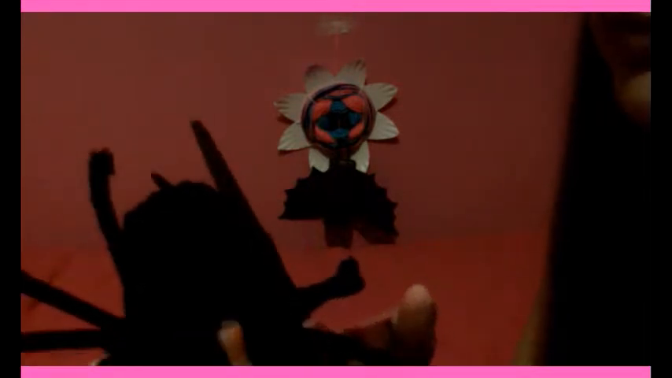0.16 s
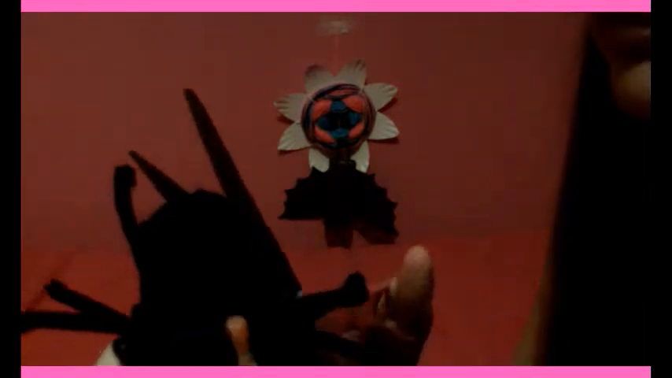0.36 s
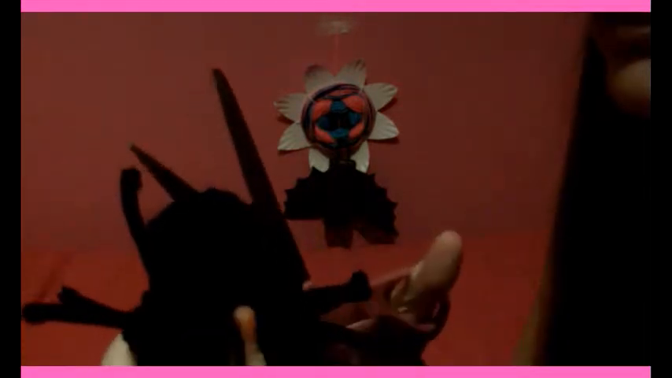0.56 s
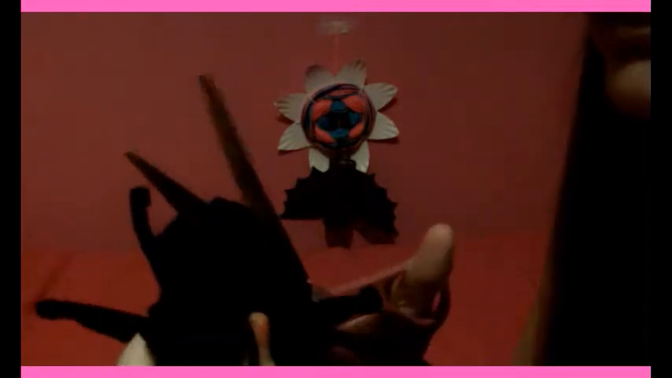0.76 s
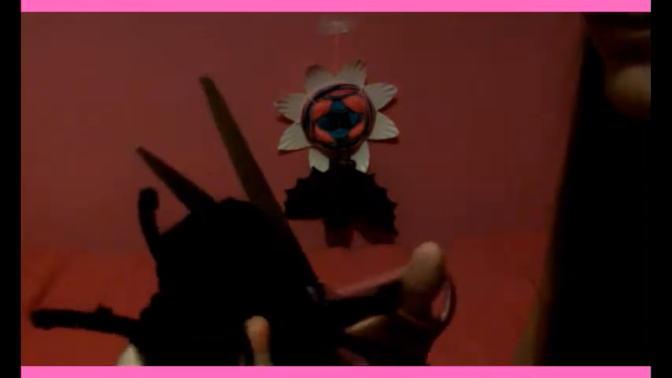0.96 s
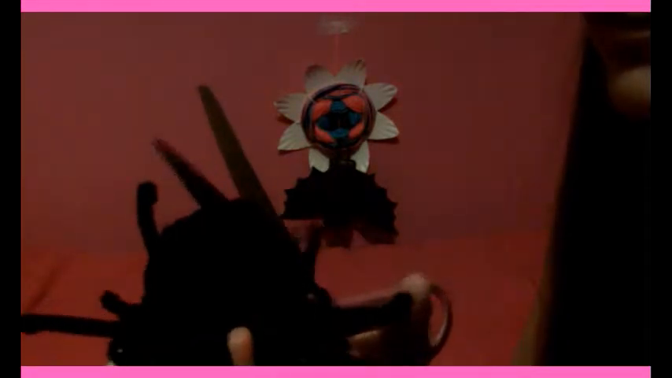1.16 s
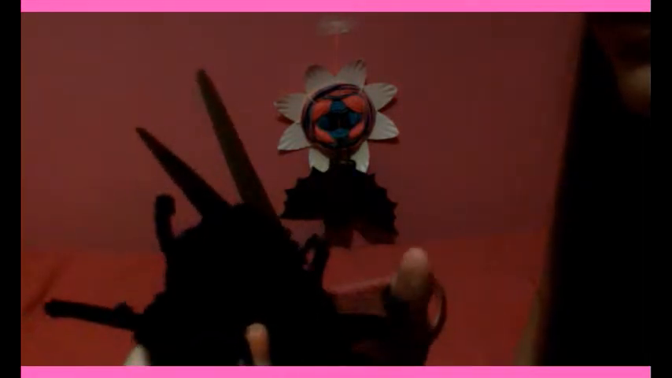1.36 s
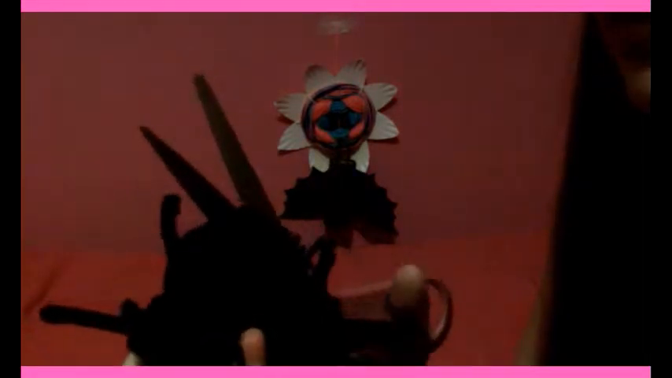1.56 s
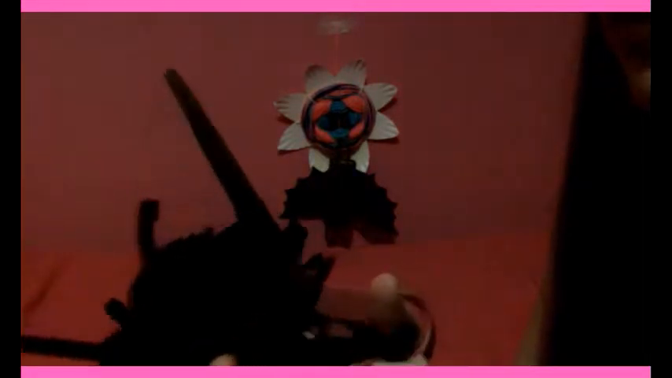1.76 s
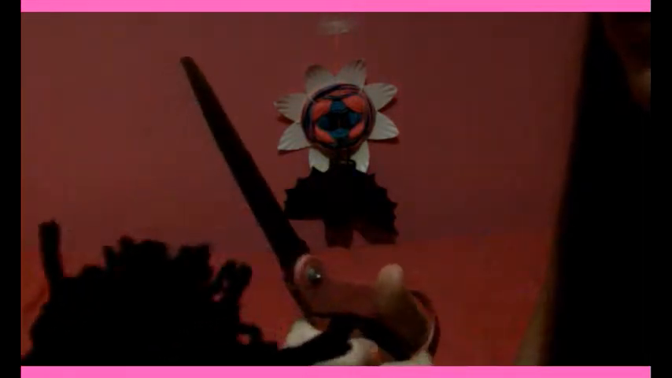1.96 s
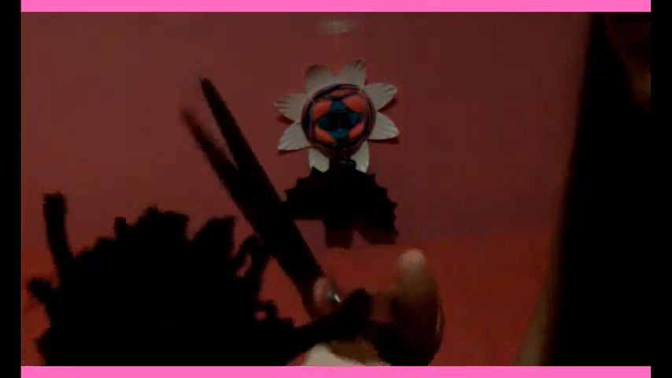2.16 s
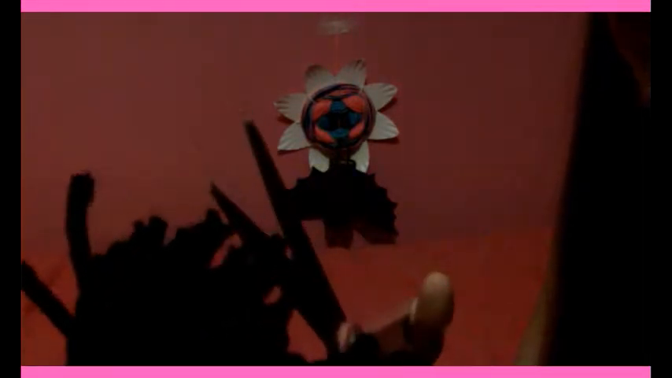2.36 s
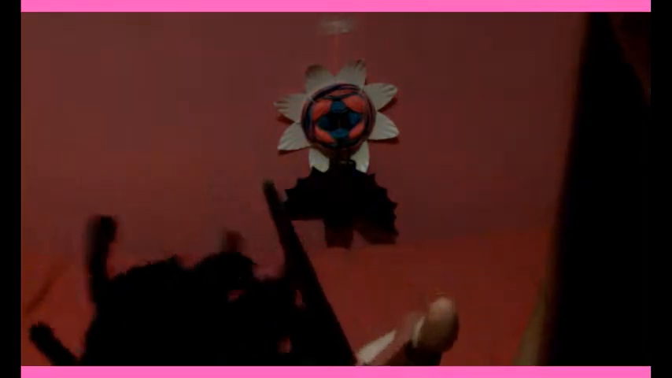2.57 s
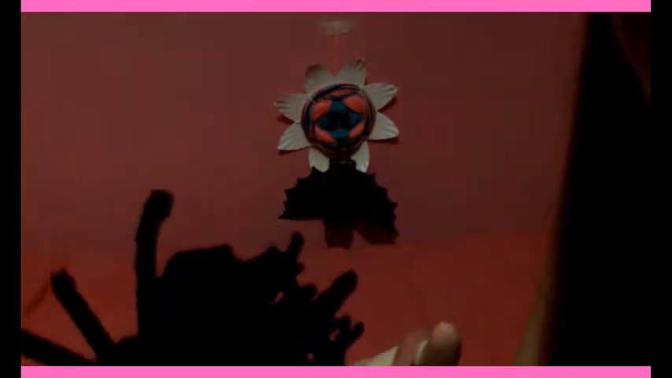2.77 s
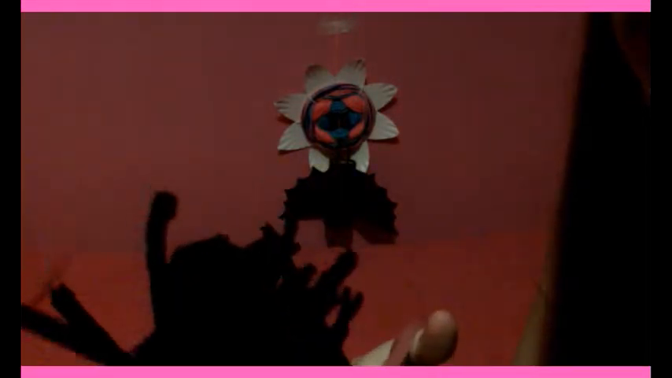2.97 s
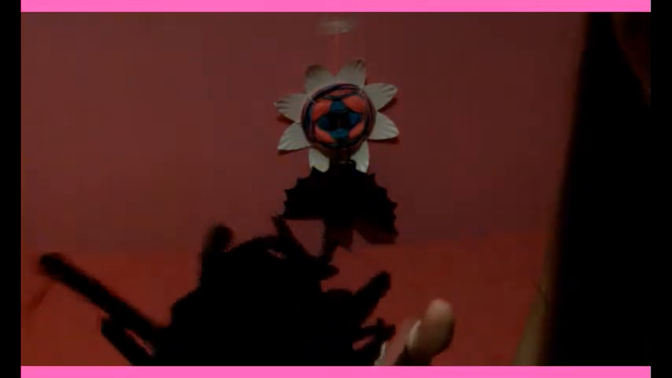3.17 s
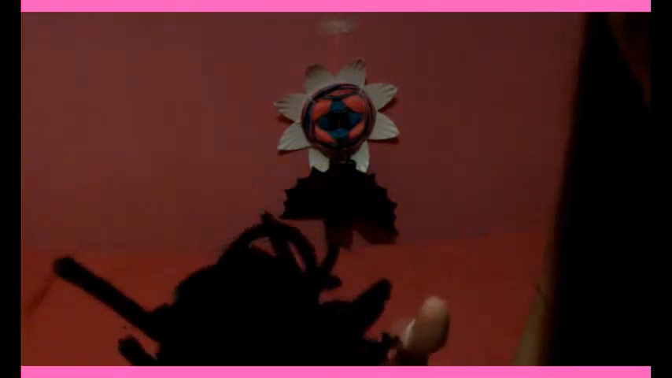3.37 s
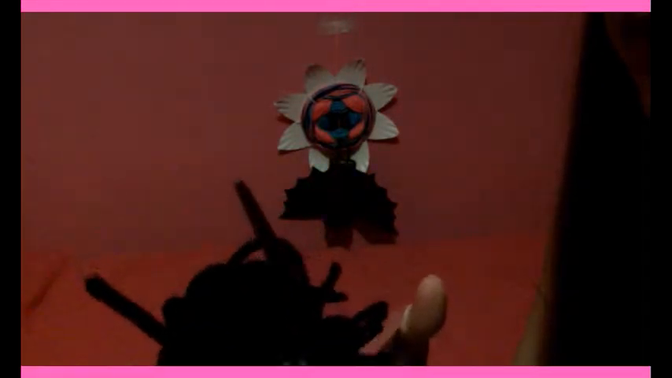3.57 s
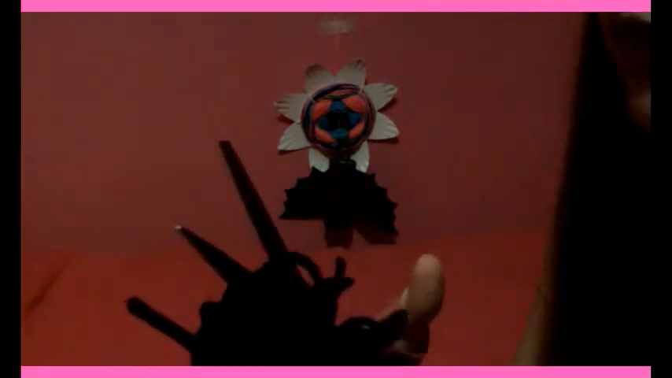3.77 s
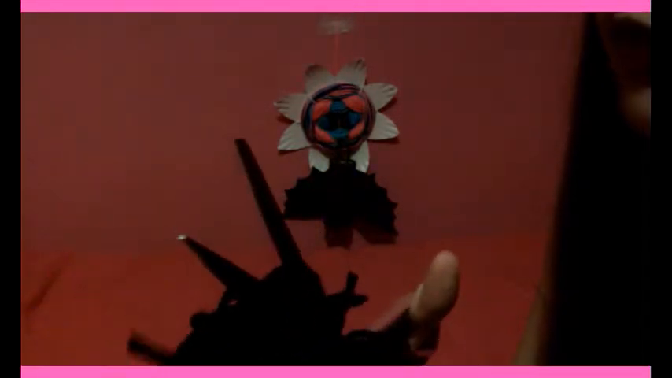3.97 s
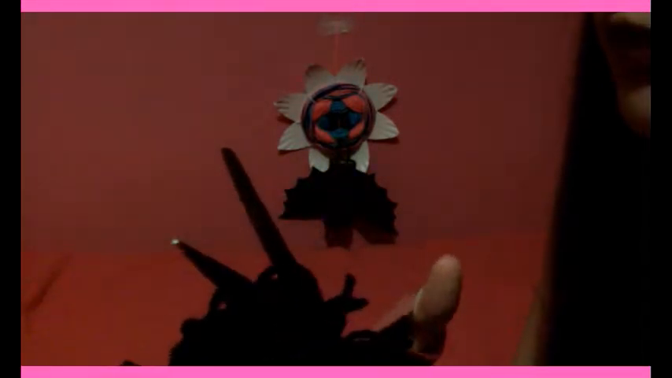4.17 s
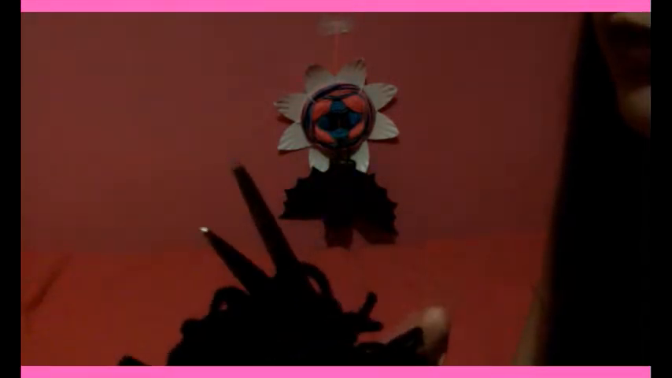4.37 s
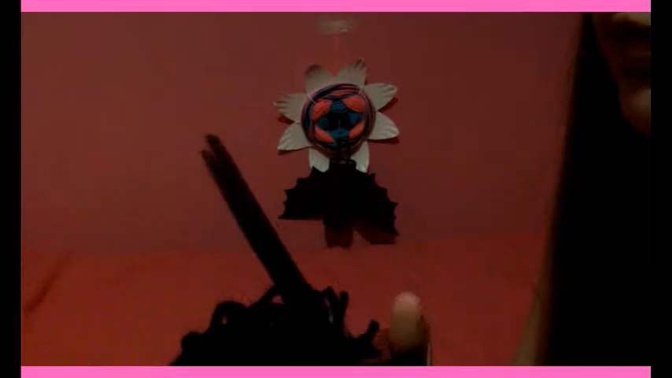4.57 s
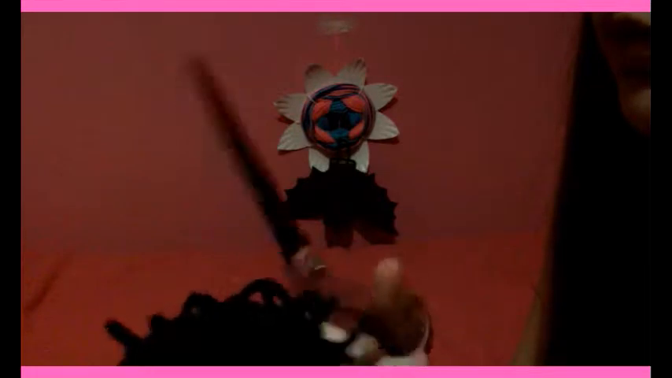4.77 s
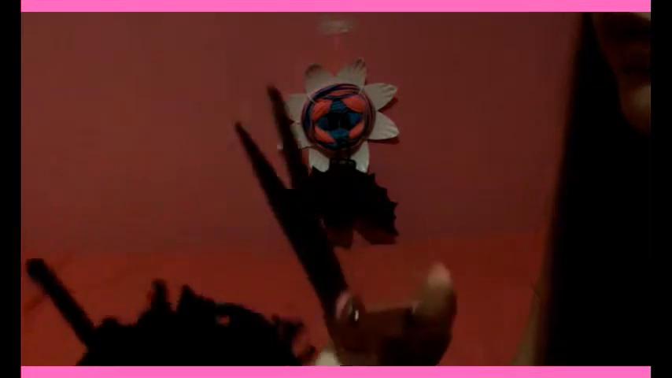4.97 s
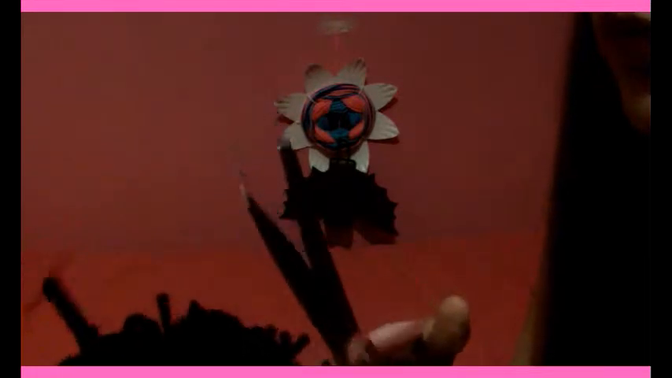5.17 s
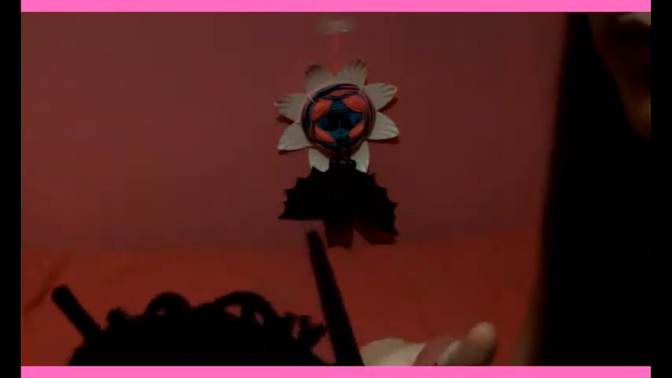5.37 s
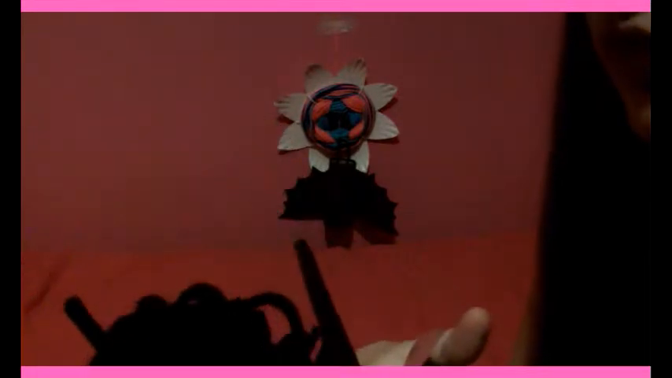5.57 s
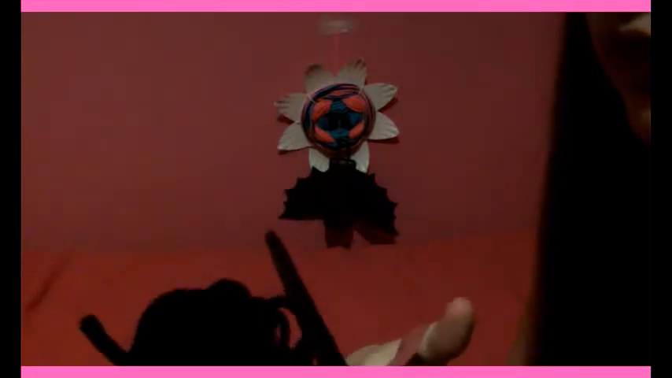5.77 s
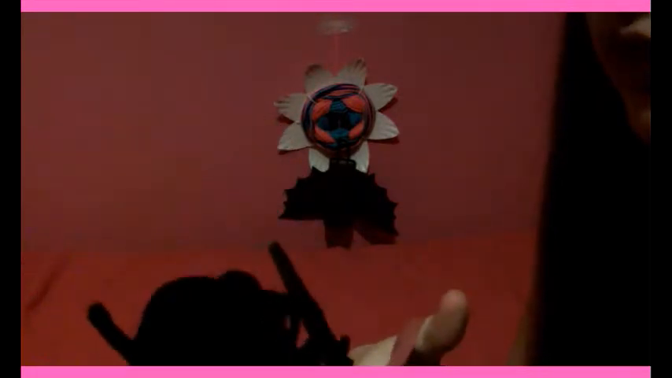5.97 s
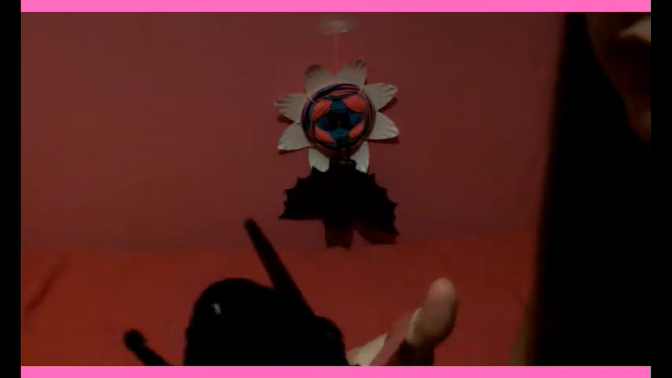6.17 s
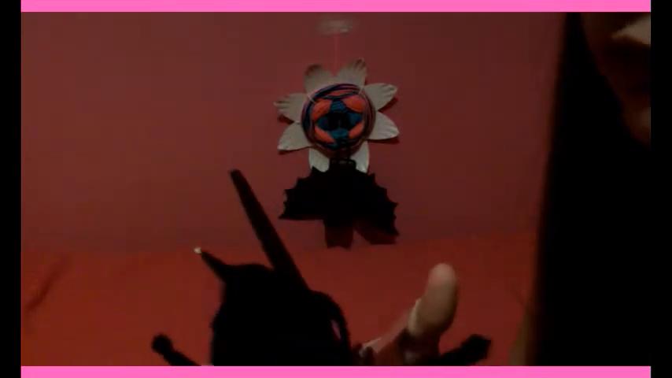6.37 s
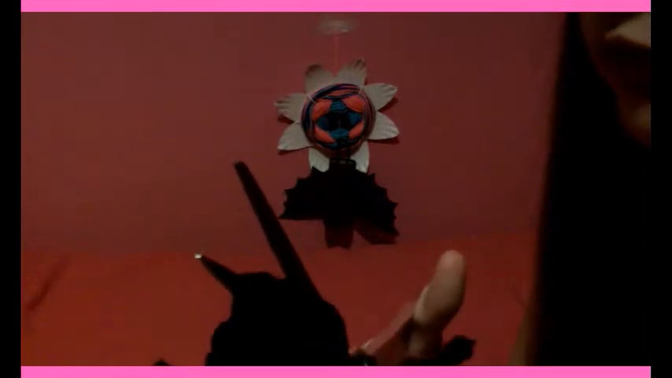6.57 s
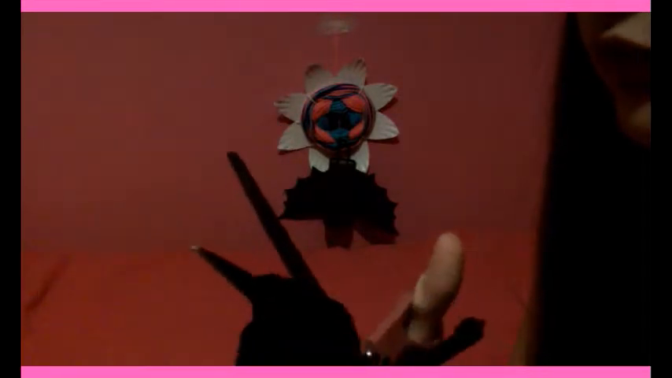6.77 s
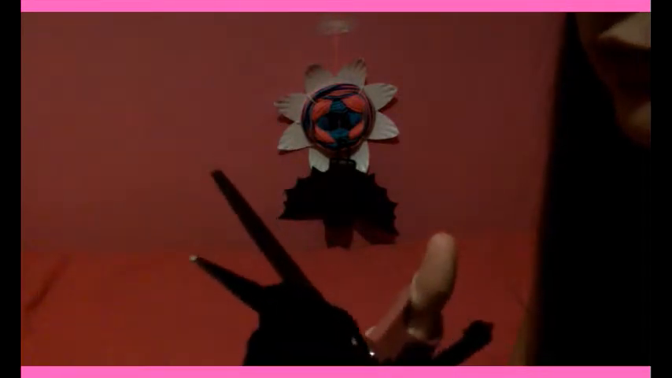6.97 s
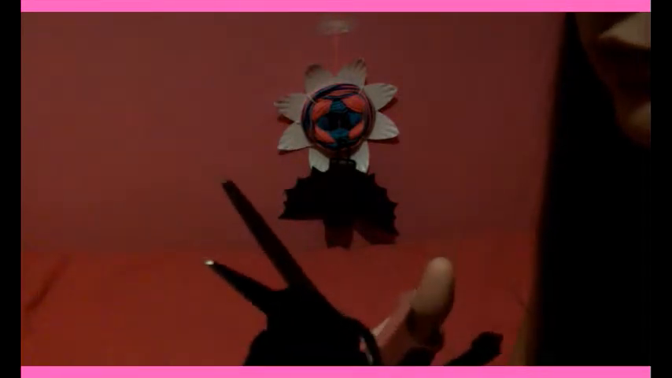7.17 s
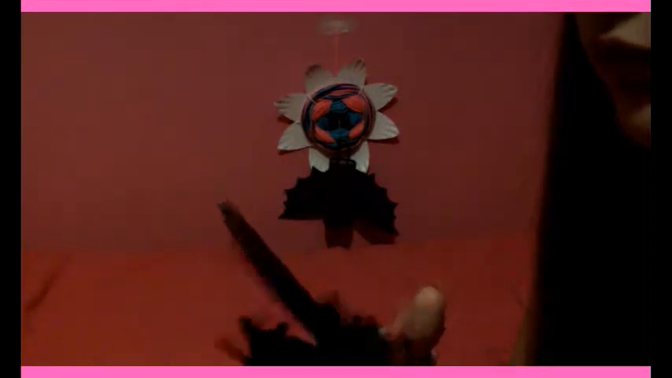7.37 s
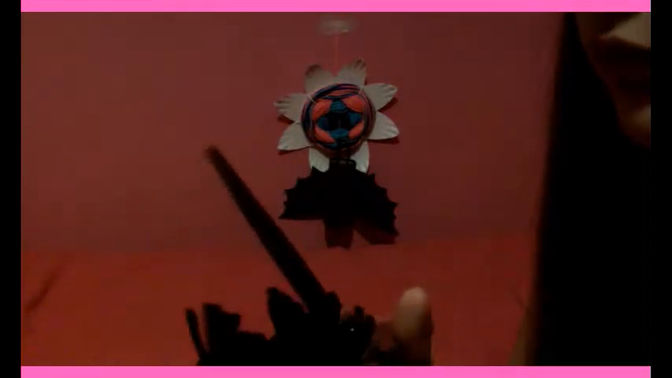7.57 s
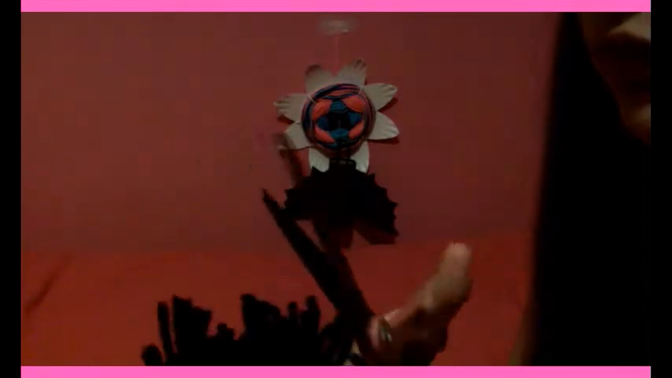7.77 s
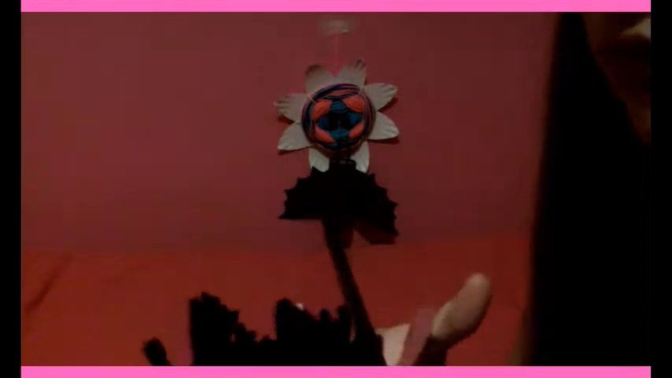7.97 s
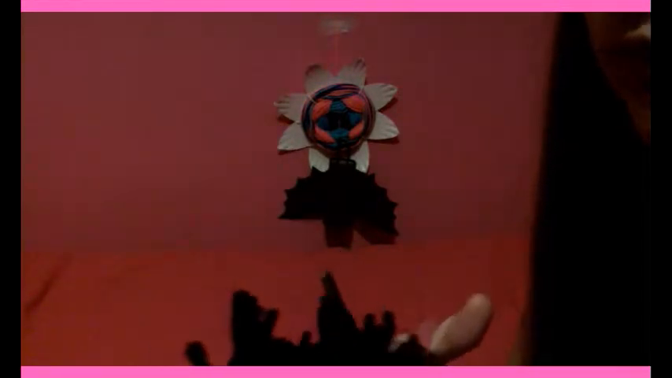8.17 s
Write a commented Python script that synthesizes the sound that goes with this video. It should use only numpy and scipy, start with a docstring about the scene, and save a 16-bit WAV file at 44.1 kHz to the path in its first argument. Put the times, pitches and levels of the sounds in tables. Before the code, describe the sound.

Scissors snip through yarn in short, irregular clusters, with soft rubbing and light metallic ticks, close up in a quiet room.

```python
"""Scissors cutting yarn

Scissors work through loops of yarn close to two microphones in a quiet room. The blades
part or rub fibres, whose many tiny snaps make the steel ring; they also tick together and
reopen. Edge sliding on edge gives a brief squeak. Faint knocks, a creak and a dull rub
come from the table. Room tone and microphone hiss lie under it all."""
import sys
import numpy as np
from scipy import signal
from scipy.fft import rfft, irfft, next_fast_len
from scipy.io import wavfile
from scipy.ndimage import uniform_filter1d

SR = 44100
rng = np.random.default_rng(int(sys.argv[2]) if len(sys.argv) > 2 else 0)


def unload_wav(signal):
    """Save mono or channel-first audio to the path in sys.argv[1] as 16-bit WAV at rate SR, clipped to [-1, 1]."""
    wavfile.write(
        sys.argv[1],
        SR,
        np.round(np.clip(np.atleast_2d(signal).T, -1, 1) * 32767).astype(np.int16),
    )


N = 362267


def amp(db):
    """Turn decibels into a number to multiply a sound by."""
    return 10 ** (np.asarray(db) / 20)


def at_hz(points, hz):
    """Read between a table's rows at a frequency, giving each octave equal room."""
    row_hz, values = np.transpose(points)
    return np.interp(np.log(hz), np.log(row_hz), values)


def at_time(points, s):
    """Read between a table's rows at a time in seconds."""
    return np.interp(s, *np.transpose(points))


def add(out, start, x):
    """Mix x into out, beginning at sample number start."""
    x = x[max(-start, 0):N - start]
    out[max(start, 0):max(start, 0) + len(x)] += x


def resonate(x, hz, width_hz):
    """Make x ring around one pitch; a narrower width rings longer."""
    r = np.exp(-np.pi * width_hz / SR)
    feedback = [1, -2 * r * np.cos(2 * np.pi * min(hz, .45 * SR) / SR), r * r]
    return signal.lfilter(np.array([1, 0, -1]) * (1 - r * r) / 2, feedback, x)


def ring(force, tones, lift_db=0, damping=1):
    """An object rings at several tones at once; noise comes out about as strong as it went in."""
    hz, width, level_db = np.transpose(tones)
    gains, width = amp(level_db + lift_db), width * damping
    gains[1::2] *= -1   # neighbours alternate in sign, so no holes open between them
    out = sum(g * resonate(resonate(force, f, w), f, w) for g, f, w in zip(gains, hz, width))
    return out / np.sqrt(np.sum(gains ** 2 * np.pi * width / (2 * SR)))


def friction(snaps_per_s, spread_db, rub_share):
    """Tiny snaps of uneven size come at random over steady rubbing."""
    sizes = amp(spread_db * np.minimum(rng.exponential(1, N), 4)) * rng.choice([-1, 1], N)
    snaps = sizes * (rng.random(N) < snaps_per_s / SR)
    rubbing = rng.standard_normal(N)
    return np.sqrt(1 - rub_share) * snaps / snaps.std() + np.sqrt(rub_share) * rubbing


def swell(s, rise_ms, fall_ms, grain):
    """A push grows, peaks at time s and lets go. Gives its first sample and its force."""
    start = max(int((s - rise_ms / 300) * SR), 0)
    stop = min(int((s + fall_ms / 300) * SR) + 400, N)
    ms = (np.arange(start, stop) / SR - s) * 1000
    from_peak = np.abs(ms / np.where(ms < 0, rise_ms, fall_ms))
    return start, grain[start:stop] * np.exp(-.5 * from_peak ** 2.09)


# The colour of the background. Each row: frequency in Hz, relative level in dB.
HISS_COLOUR = [(15, -53), (25, -21), (60, -20.5), (122, -14), (253, -5.5), (553, -2), (646, -1),
               (1450, -3.5), (1980, -5.5), (2440, -5.5), (10200, -8), (12500, -6.5), (12800, -25),
               (16300, -70), (22000, -120)]
# How alike left and right are. Each row: frequency in Hz, likeness from 0 to 1.
HISS_LIKENESS = [(60, 0.16), (300, 0.2), (1500, 0.11), (13000, .03)]

def room_tone(level_db=-61):
    """Steady room tone and hiss, mostly different in each microphone."""
    hz = np.maximum(np.arange(N // 2 + 1) * SR / N, 1)
    shared, opposite = rfft(rng.standard_normal((2, N))) * amp(at_hz(HISS_COLOUR, hz))
    alike = at_hz(HISS_LIKENESS, hz)
    both = irfft(np.sqrt(1 + alike) * shared + np.sqrt(1 - alike) * opposite * [[1], [-1]], N)
    return amp(level_db) * both / both.mean(axis=0).std()


def knocks(rows, fade_cycles, overtone_db):
    """Each knock rings at one pitch and two weaker, higher ones, and dies away quickly."""
    out, t = np.zeros(N), np.arange(2000) / SR
    for s, level_db, hz in rows:
        tone = sum(amp(k * overtone_db) * np.sin(2 * np.pi * ratio * hz * t)
                   for k, ratio in enumerate((1, 1.85, 2.9)))
        shape = np.exp(-t * hz / fade_cycles) * (1 - np.exp(-t * hz / 0.14))
        add(out, int(s * SR), amp(level_db) * tone * shape)
    return out


def creak(start_s=3.801, gap_s=.0125, level_db=-49.5, swell_db=4.5, hz=627, climb_hz=396):
    """Eight uneven slips make a low creak, rising in pitch and force near the end."""
    progress, chance = np.linspace(0, 1, 8), rng.standard_normal((8, 3))
    times = start_s + gap_s * (np.arange(8) + .15 * chance[:, 0])
    levels = level_db + swell_db * progress ** 2 + 1.5 * chance[:, 1]
    pitches = hz + climb_hz * progress ** 8 + 30 * chance[:, 2]
    return knocks(zip(times, levels, pitches), fade_cycles=3.4, overtone_db=-8)


# Small knocks on the table. Each row: start in seconds, level in dB, pitch in Hz.
TABLE_KNOCKS = [(1.946, -51, 1320), (1.991, -50, 3060), (2.165, -45.5, 866), (2.501, -50, 1300),
                (2.513, -50, 1170), (2.532, -49.5, 850), (2.697, -50, 1380), (2.704, -48.5, 1310),
                (2.717, -50, 1280), (2.729, -50, 1340), (2.8, -42, 847), (4.083, -43.5, 2180),
                (4.707, -35, 2650)]
# A dull rub. Each row: peak time in seconds, rise and fall in ms, level in dB, pitch and width in Hz.
DULL_RUB = [(2.56, 53, 200, -65.5, 464, 603)]

def table():
    """The table knocks, creaks and is rubbed, all with little bass."""
    out = knocks(TABLE_KNOCKS, fade_cycles=3.7, overtone_db=-5.5) + creak()
    grain = friction(snaps_per_s=400, spread_db=4.0, rub_share=.6)
    for s, rise_ms, fall_ms, level_db, hz, width_hz in DULL_RUB:
        start, force = swell(s, rise_ms, fall_ms, grain)
        add(out, start, amp(level_db) * ring(force, [(hz, width_hz, 0)]))
    return signal.sosfilt(signal.butter(3, 300, "high", fs=SR, output="sos"), out)


# Edge slides on edge as the tips close or part.
# Each row: start and end in seconds, first and last pitch in Hz, level in dB.
EDGE_SQUEAKS = [(1.591, 1.605, 9000, 12570, -19), (7.752, 7.8, 12000, 7900, -55)]

def squeaks():
    """The touching point runs along the edges: the pitch glides and levels off, faltering midway."""
    out = np.zeros(N)
    for start_s, end_s, first_hz, last_hz, level_db in EDGE_SQUEAKS:
        progress = np.linspace(0, 1, int((end_s - start_s) * SR))
        hz = first_hz + (last_hz - first_hz) * np.sin(progress * np.pi / 2)
        tone = np.sin(2 * np.pi * np.cumsum(hz) / SR)
        falter = 1 - .6 * np.exp(-((progress - .48) / 0.064) ** 2)
        shape = np.sin(np.pi * progress) ** 0.7 * falter
        rough_edge = 1 + 2.45 * uniform_filter1d(rng.standard_normal(3000), size=49)[:len(tone)]
        add(out, int(start_s * SR), amp(level_db) * shape * rough_edge * tone)
    return resonate(out, hz=10800, width_hz=6000)


# Short scissor sounds: snips through yarn, ticks of steel on steel, and blades reopening.
# Each row: peak time in seconds, rise in ms, edge and whole-blade levels in dB, edge pitch in Hz.
SHORT_SOUNDS = [(0.8345, 0.92, -56, -71, 11500), (0.8858, 10, -59, -50, 11200),
                (0.9847, 0.89, -50, -48, 9700), (1.0082, 4.6, -50, -57, 11400),
                (1.032, 7.4, -44.5, -42, 12200), (1.077, 4, -44, -43, 12000),
                (1.0914, 14.4, -41, -37, 12150), (1.1425, 25, -46.5, -44.5, 10900),
                (1.1482, 5, -28, -34.5, 10140), (1.174, 7.9, -45.5, -48.5, 11400),
                (1.182, 3.2, -48, -47, 9980), (1.5121, 8.8, -48, -43, 8050), (1.536, 7, -52, -52, 10800),
                (1.588, 4.8, -35.5, -38.5, 10100), (1.599, 3.8, -31, -49, 11800),
                (1.631, 7.3, -47, -54, 11900), (2.087, 7.5, -40.5, -50.5, 11900),
                (2.122, 24, -51, -51.5, 11700), (2.1387, 0.38, -33, -53, 11560),
                (4.1786, 15, -47.5, -55.5, 11400), (4.2021, 13, -49, -57, 9400),
                (4.2288, 20, -54.5, -55, 11400), (4.2968, 2.5, -45, -46, 10600),
                (4.3146, 6, -39, -40, 7500), (4.3315, 5.2, -37.5, -42, 7640),
                (4.3424, 4.8, -39, -35.5, 8500), (4.3564, 7, -35.5, -42, 8600),
                (4.378, 3, -33, -43.5, 9200), (4.4172, 2.9, -27.5, -39, 11560),
                (4.4308, 3.2, -23.5, -35.5, 11630), (4.4397, 5, -29, -37, 9150),
                (4.689, 8.5, -42.5, -59, 11500), (4.7086, 22, -59, -53, 11100),
                (4.893, 4.5, -39.5, -47, 12050), (4.9195, 12, -49.5, -50, 11700),
                (4.9267, 0.49, -36, -53, 11300), (6.991, 9, -51.5, -53, 10900),
                (7.1025, 8, -44, -50.5, 7060), (7.135, 24, -55, -60, 7600), (7.253, 7, -47, -56, 8500),
                (7.2735, 4, -42, -50, 8400), (7.3, 5.8, -30, -43, 8550), (7.328, 6.2, -40, -52, 8600),
                (7.337, 2.5, -29, -52, 11200), (7.3458, 8.1, -26.5, -50, 8600),
                (7.37, 0.67, -30, -54, 11200), (7.3723, 2.1, -20, -54, 11400), (7.381, 3, -34, -38, 8760),
                (7.7005, 4.5, -38.5, -51.5, 11600), (7.7555, 10, -50, -70, 12300)]
# Long rubs of steel on wool.
# Each row: peak time in seconds, rise and fall in ms, edge and whole-blade levels in dB.
YARN_RUBS = [(0.0082, 58.6, 17, -52, -58), (0.1297, 96, 41, -61, -59), (0.211, 72, 12.6, -52, -59.5),
             (0.2699, 30, 54, -53, -55), (0.41, 30, 58, -54, -57.5), (0.705, 34, 35, -53, -58),
             (0.872, 40, 62, -54, -58), (0.99, 37, 140, -64, -52.5), (1.3111, 28, 26, -49.5, -58.5),
             (1.4955, 43, 110, -54.5, -51.5), (1.6481, 68, 55, -59, -59.5), (2.148, 47, 35, -52.5, -57.5),
             (2.9569, 67, 64, -62, -66), (3.1664, 11.5, 23, -50.5, -57), (3.425, 52, 56, -51, -58),
             (3.6528, 23, 56, -48, -56), (3.7398, 14, 58, -58, -59.5), (3.838, 10, 86.7, -59, -61.5),
             (4.16, 33, 16, -54.5, -64), (4.2814, 23.7, 200, -53, -53.5), (4.4581, 100, 12.5, -56, -51.5),
             (4.9381, 41, 19.3, -48, -58), (5.288, 14, 22, -56.5, -67), (5.812, 42, 13.1, -56, -72),
             (6.1392, 58, 100, -57, -63.5), (6.3113, 19, 63, -53.5, -62), (6.385, 21, 22, -51.5, -63),
             (6.7547, 18, 28, -50, -60.5), (6.7887, 81, 66, -52.5, -58), (6.9399, 12, 48, -51, -55.5),
             (7.09, 25, 30, -56, -57), (7.29, 25, 20, -52, -51), (7.3886, 92, 16, -54, -49.5),
             (7.4203, 1.8, 21, -49, -57), (7.7228, 22, 35, -47.5, -50.5)]
# Where the whole blades ring most: it sinks as a cut closes and starts high as they reopen.
# Each row: time in seconds, pitch in Hz.
BLADE_PITCH = [(0, 3530), (0.45, 4600), (1.0, 4100), (1.6, 4350), (2.08, 5050), (2.15, 4200), (4.2, 3800),
               (4.31, 5200), (4.38, 4400), (4.43, 4900), (4.445, 3770), (4.69, 4600), (6.4, 3800),
               (7.1, 4570), (7.33, 3840), (7.45, 3730), (7.7, 5070), (7.76, 3980)]
# The hand shifts its hold. Each row: time in seconds, handle level in dB when the blades are at -50 dB.
HANDLE_LEVEL = [(0, -64), (0.9, -68), (1.1, -61), (1.5, -65.5), (2.1, -61.5), (3.5, -62.5), (4.2, -61),
                (4.3, -59.5), (4.45, -63), (4.9, -59.5), (6.3, -62), (7.0, -63), (7.3, -60.5), (7.7, -59.5)]

def pushes(rub_edge_hz=11200, handle_share=0.55):
    """List every short sound and rub; the handles follow a share of the blades' changes in level."""
    shorts = [(s, rise_ms, 1.38 + 0.43 * rise_ms, edge_db, blade_db, hz)   # slow to rise, slow to fall
              for s, rise_ms, edge_db, blade_db, hz in SHORT_SOUNDS]
    rubs = [(*rub, rub_edge_hz) for rub in YARN_RUBS]
    rows = []
    for s, rise_ms, fall_ms, edge_db, blade_db, edge_hz in shorts + rubs:
        handle_db = at_time(HANDLE_LEVEL, s) + handle_share * (blade_db + 50)
        blade_hz = at_time(BLADE_PITCH, s)
        rows.append((s, rise_ms, fall_ms, edge_db, blade_db, handle_db, edge_hz, blade_hz))
    return rows


def nearness(tones, hz, reach_hz=600):
    """How close each tone is to a pitch, from 0 (far away) to 1 (right on it)."""
    return np.exp(-((np.array(tones)[:, 0] - hz) / reach_hz) ** 2)


# The tones the scissors ring at. Each row: pitch in Hz, width in Hz, relative level in dB.
EDGE_TONES = [(7390, 990, -3), (8564, 510, -3), (9510, 1120, -0.5), (10550, 1830, -4), (11255, 650, -0.5),
              (12240, 550, -3.5)]   # the thin edges
BLADE_TONES = [(3290, 560, 0), (3850, 480, 1.5), (4330, 640, 1), (4760, 536, 4), (5450, 1100, 3),
               (6040, 1500, -3)]   # the whole blades
HANDLE_TONES = [(700, 1400, 0.5), (1297, 165, 0), (2012, 200, 4.5), (2655, 360, 4.5)]   # handles, pivot and wool

def scissors():
    """Each push rings the steel; tones near its two pitches are made louder."""
    out, rows = np.zeros(N), pushes()
    grain = friction(snaps_per_s=4000, spread_db=3.5, rub_share=0.36)
    scatter_db = 1.8 * rng.standard_normal((len(rows), 3, len(EDGE_TONES)))
    for row, (edge_chance, blade_chance, handle_chance) in zip(rows, scatter_db):
        s, rise_ms, fall_ms, edge_db, blade_db, handle_db, edge_hz, blade_hz = row
        start, force = swell(s, rise_ms, fall_ms, grain)
        if rise_ms < 1.5:
            force[int(s * SR) - start] += 9.0   # steel meets steel in one tick
        # light pushes leave the blades buried in wool, so they ring less and more evenly
        firmness = np.clip((max(edge_db, blade_db) + 56) / 14, 0, 1)
        damping = 1 + 1.47 * (1 - firmness)
        blade_lead = np.clip((blade_db - edge_db + 7) / 11, 0, 1)
        edge_lift = (3.9 + 8.4 * firmness) * nearness(EDGE_TONES, edge_hz) + firmness * edge_chance
        blade_lift = (4 + 7 * blade_lead) * nearness(BLADE_TONES, blade_hz) + firmness * blade_chance
        handle_lift = handle_chance[:len(HANDLE_TONES)]
        add(out, start, amp(edge_db) * ring(force, EDGE_TONES, edge_lift, damping))
        add(out, start, amp(blade_db) * ring(force, BLADE_TONES, blade_lift, damping))
        add(out, start, amp(handle_db) * ring(force, HANDLE_TONES, handle_lift, damping))
    return out


def room(x, echo_db=-12.5, fade_s=0.15, sway_s=.012, right_louder_db=1.8):
    """Sound reaches both microphones directly, then as a short wash of echoes."""
    t = np.arange(int(.3 * SR)) / SR
    tail = rng.standard_normal((2, len(t))) * amp(-60 * t / fade_s) * (t > .004)
    tail = amp(echo_db) * tail / np.sqrt(np.mean(np.sum(tail ** 2, axis=1)))
    echoes = signal.fftconvolve(x[None], tail, axes=1)[:, :N]
    # the hands keep moving, so the left and right waves drift in and out of step
    sway_times = np.arange(0, N / SR + sway_s, sway_s)
    sway = rng.standard_normal(2000)[:len(sway_times)]
    shift = .35 + .4 * np.interp(np.arange(N) / SR, sway_times, sway)
    quarter_cycle_late = signal.hilbert(x, next_fast_len(N))[:N].imag
    direct = (x + shift * quarter_cycle_late * [[-1], [1]]) / np.sqrt(1 + shift ** 2)
    return (direct + echoes) * amp([[-right_louder_db / 2], [right_louder_db / 2]])


def scene():
    """The scissors and the table share one room, over its steady background."""
    return room(scissors() + squeaks() + table()) + room_tone()


def record(dry):
    """Cut away the highest treble, from 13000 Hz up."""
    return signal.sosfilt(signal.cheby2(20, 66, 13000, fs=SR, output="sos"), dry)


dry = scene()
out = record(dry)
unload_wav(out)
```